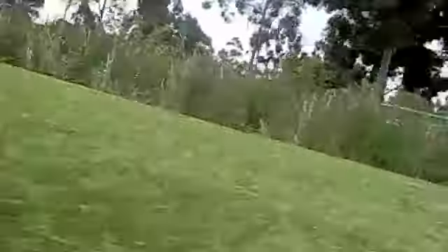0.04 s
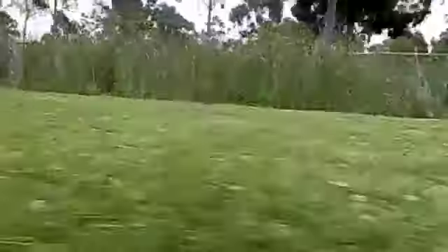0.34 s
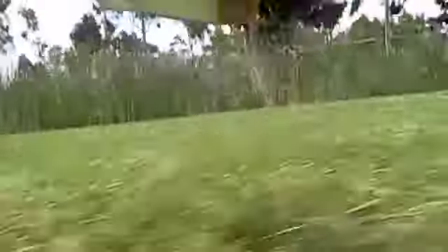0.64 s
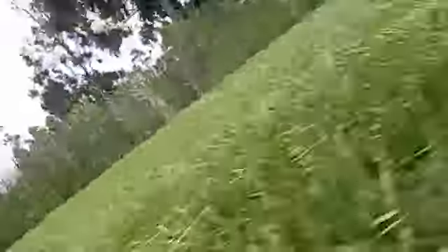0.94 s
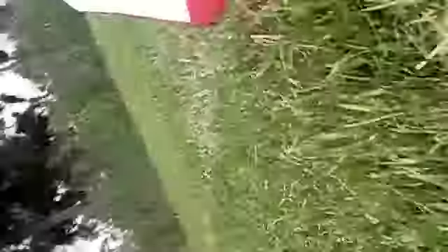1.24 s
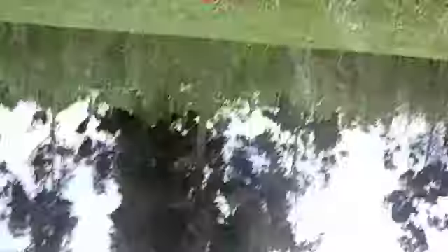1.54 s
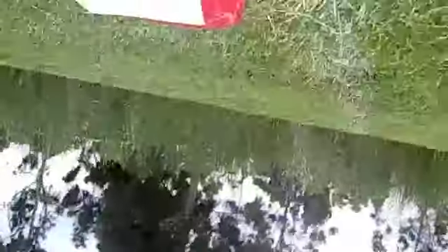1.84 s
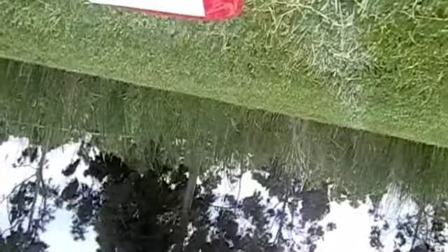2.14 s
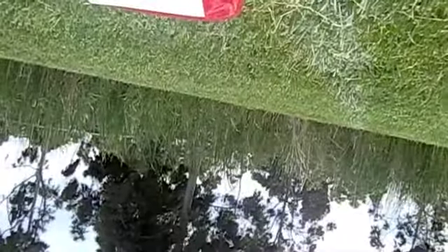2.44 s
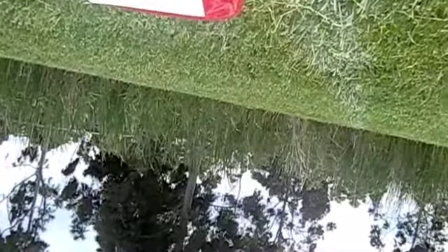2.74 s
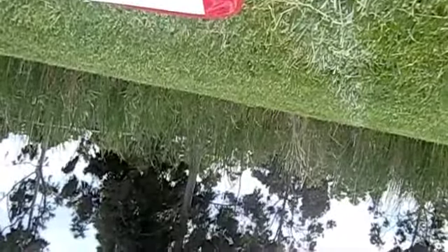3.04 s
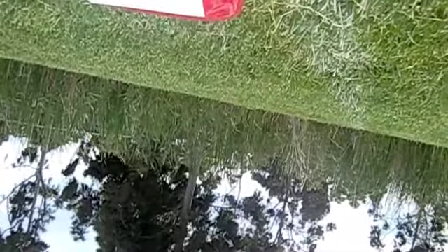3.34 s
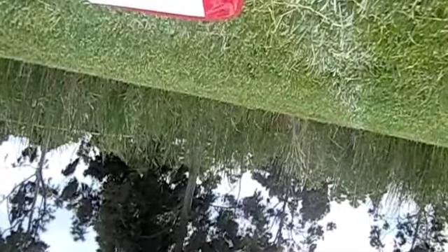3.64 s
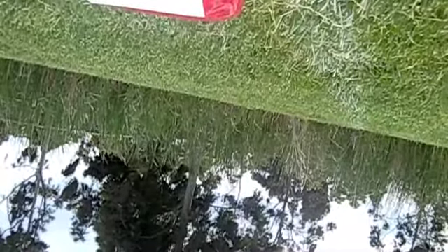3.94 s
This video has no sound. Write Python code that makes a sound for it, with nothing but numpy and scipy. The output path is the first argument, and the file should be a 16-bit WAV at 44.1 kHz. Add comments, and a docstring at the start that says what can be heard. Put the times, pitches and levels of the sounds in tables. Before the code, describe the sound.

Loud wind buffets and hisses over a microphone on a model aircraft for the first second, while a faint propeller swish winds down. From about 1.1 to 1.9 seconds the aircraft thumps on turf and scrapes through grass, with stalks snapping sharply. Around 2 seconds a small servo quietly whirs and ticks. Low outdoor rumble, a very faint hum and a faint insect trill remain until 4 seconds.

```python
"""Model aircraft landing in grass, heard on board.

Wind buffets the microphone and hisses past the airframe while the propeller winds down.
The aircraft thumps on the turf and scrapes through the stalks, which snap against it.
Once it lies still a servo whirs and ticks; outdoor rumble, a faint hum and an insect trill remain."""
import sys
import numpy as np
from scipy.fft import rfft, irfft, next_fast_len
from scipy.io import wavfile
from scipy.ndimage import map_coordinates

SR = 44100
rng = np.random.default_rng(int(sys.argv[2]) if len(sys.argv) > 2 else 0)


def int16_out(signal):
    """Quantize to a 16-bit WAV file."""
    q = np.round(np.clip(np.atleast_2d(signal).T, -1, 1) * 32767)
    wavfile.write(sys.argv[1], SR, q.astype(np.int16))


N = 176400
T = np.arange(N) / SR
CLIP_CEILING, BAND_LIMIT_HZ, CLICK_ATTACK_S = .71, 12300, .0004


def amp(db):
    """Decibels to gain."""
    return 10 ** (np.asarray(db) / 20)


def unit(x):
    """Scaled to rms 1."""
    return x / np.sqrt(np.mean(x ** 2) + 1e-20)


def curves(rows):
    """One value per sample for each column after the time."""
    times, *columns = np.transpose(rows)
    return [np.interp(T, times, column) for column in columns]


def wobble(knots_per_s):
    """Smooth random curve."""
    return map_coordinates(rng.standard_normal(8192), [T * knots_per_s + 2], mode="mirror")


def filtered(x, response):
    """x through a gain given as a function of frequency."""
    size = next_fast_len(N + SR // 2)
    return irfft(rfft(x, size) * response(np.fft.rfftfreq(size, 1 / SR)), size)[:N]


def coloured(x, spectrum):
    """x through (f/Hz, level/dB) points, rms 1."""
    hz, db = np.transpose(spectrum)
    return unit(filtered(x, lambda f: amp(np.interp(np.log(f + 1), np.log(hz + 1), db))))


def noise(spectrum):
    """Coloured noise, rms 1."""
    return coloured(rng.standard_normal(N), spectrum)


def struck(start_s, attack_s, t60_s):
    """Envelope of a blow."""
    age = np.maximum(T - start_s, 0)
    return (1 - np.exp(-age / attack_s)) * np.exp(-np.minimum(np.log(1000) * age / t60_s, 50))


def tone(hz):
    """Sine along a pitch curve, rms 1."""
    return np.sqrt(2) * np.sin(2 * np.pi * (np.cumsum(hz) / SR + rng.random()))


def grains(hits_per_s=3000, spread_db=5, rubbing_db=-5):
    """Dense tiny contacts of uneven size over smooth rubbing."""
    hits = (rng.random(N) < hits_per_s / SR) * rng.choice([-1, 1], N)
    sizes = amp(spread_db * np.minimum(rng.standard_normal(N), 2))
    return unit(hits * sizes) + amp(rubbing_db) * rng.standard_normal(N)


# Outdoor rumble: f/Hz, level/dB
RUMBLE_SPECTRUM = [(20, -38), (42, -21.5), (55, -5), (72, 2.5), (95, -0.5), (115, -4.5), (145, -4),
                   (190, -14.5), (290, -19.5), (380, -29.5), (700, -42.5), (3000, -78)]
# Faint air: f/Hz, level/dB
AIR_SPECTRUM = [(100, 1.5), (500, -3.5), (1200, -3.5), (2000, -7), (3500, -9), (6000, -12), (9000, -19),
                (12000, -19.5)]
# Electrical hum: f/Hz, level/dB at reference_s
HUM_PARTIALS = [(269, -74.5), (538, -80.5)]


def background(reference_s=3):
    """Outdoor rumble, faint air and the hum of idle electrics, all slowly growing."""
    t = T - reference_s
    rumble = amp(-50.5 + 3.5 * t + 1.8 * wobble(18)) * noise(RUMBLE_SPECTRUM)
    air = amp(-65.5 + 2.5 * t) * noise(AIR_SPECTRUM)
    hum = sum(amp(db + 4 * t + wobble(10)) * tone(hz + 2.7 * wobble(53)) for hz, db in HUM_PARTIALS)
    return rumble + air + hum


# Insect trill: t/s, level/dB
TRILL_LEVEL = [(2.0, -76), (2.23, -84), (2.45, -79), (2.88, -81.5), (2.96, -75), (3.2, -73), (3.33, -82),
               (3.43, -73.5), (3.62, -72), (3.88, -73), (4, -72)]


def insect(pitch_hz=5670, wander_hz=23.88, flutter_db=3):
    """A faint high trill flutters in the grass."""
    gain = amp(curves(TRILL_LEVEL)[0] + flutter_db * wobble(90))
    return gain * tone(pitch_hz + wander_hz * wobble(180))


# Servo motor shaft: t/s, f/Hz, level/dB
MOTOR_RUN = [(1.95, 264.2, -62), (1.975, 271, -48), (2.0, 285, -54), (2.02, 308, -47.5), (2.05, 317, -51.5),
             (2.08, 320, -60), (2.13, 350, -89)]
# Servo motor harmonics: order, level/dB
MOTOR_HARMONICS = [(1, 1), (2, -7.5), (3, -10.5)]
# Gear whistle: t/s, f/Hz, level/dB
GEAR_RUN = [(1.9, 3300, -70), (1.93, 3440, -61), (1.972, 3610, -49), (1.987, 3450, -66), (2.0, 2650, -63),
            (2.018, 2880, -58), (2.05, 2600, -63), (2.075, 2380, -68), (2.09, 2310, -93)]
# Gear harmonics: order, level/dB
GEAR_HARMONICS = [(1, 1), (2, -11), (3, -17), (4, -15)]
# Settling ticks: t/s, level/dB
SERVO_TICKS = [(1.967, -47.5), (2.049, -45.5), (2.056, -47.5), (2.07, -49), (2.093, -60), (2.117, -57),
               (2.136, -59.5), (2.158, -55.5), (2.18, -56.5), (2.202, -60.5), (2.224, -58.5)]
# Servo case resonances: f/Hz, level/dB
CASE_SPECTRUM = [(300, -29), (680, 6), (1050, -21), (1350, 6.5), (1700, -27), (2700, -10), (3450, 0),
                 (4200, -10.5), (12000, -27.5)]


def servo(motor_jitter=.05, gear_jitter=.022, rough_db=1.5, grind_db=-9.5):
    """The motor grinds briefly with a gear whistle, then ticks in its case as it settles."""
    motor_hz, motor_db = curves(MOTOR_RUN)
    gear_hz, gear_db = curves(GEAR_RUN)
    motor_hz *= 1 + motor_jitter * wobble(250)
    gear_hz *= 1 + gear_jitter * wobble(700)
    motor = sum(amp(db) * tone(order * motor_hz) for order, db in MOTOR_HARMONICS)
    motor += amp(grind_db) * coloured(grains(), CRACKLE_SPECTRUM)
    motor *= amp(motor_db + rough_db * wobble(200))
    motor *= (T > MOTOR_RUN[0][0]) * (T < MOTOR_RUN[-1][0])
    gear_gain = amp(gear_db + rough_db * wobble(200)) * (T > GEAR_RUN[0][0]) * (T < GEAR_RUN[-1][0])
    gear = gear_gain * sum(amp(db) * tone(order * gear_hz) for order, db in GEAR_HARMONICS)
    ticks = sum(amp(db) * struck(start_s, CLICK_ATTACK_S, t60_s=.053) for start_s, db in SERVO_TICKS)
    return motor + gear + ticks * noise(CASE_SPECTRUM)


# Propeller winding down: t/s, rotation f/Hz, level/dB
PROPELLER_RUN = [(0, 119, -42), (.13, 116, -43), (.24, 109, -51), (.42, 102, -52), (.55, 95, -80)]
# Blade swish: f/Hz, level/dB
SWISH_SPECTRUM = [(2000, -25), (5000, -10.5), (7500, -3.5), (11000, -0.5), (12000, -2)]


def propeller(pulse_db=7):
    """A thin swish once a turn."""
    turn_hz, db = curves(PROPELLER_RUN)
    pulses = amp(pulse_db * tone(turn_hz) / np.sqrt(2))
    return amp(db) * unit(pulses * noise(SWISH_SPECTRUM))


# Motor whine (first two rows), then whistles: f/Hz, bandwidth/Hz, peak t/s, 1/e half-length/s, level/dB
WHINE_AND_WHISTLE_BANDS = [(8700, 300, .07, .17, -55.5), (7860, 260, .07, .15, -58),
                           (3160, 300, .82, .22, -47), (4664, 510, .83, .16, -49.5),
                           (2310, 170, 0.81, 0.2, -47), (1310, 160.8, 0.58, 0.23, -43)]


def whine_and_whistles():
    """Thin high motor whine at the start, then brief lower airflow whistles."""
    out = np.zeros(N)
    for hz, width_hz, peak_s, half_length_s, db in WHINE_AND_WHISTLE_BANDS:
        band = filtered(rng.standard_normal(N), lambda f: 1 / (1 + (2 * (f - hz) / width_hz) ** 2))
        out += amp(db) * np.exp(-((T - peak_s) / half_length_s) ** 2) * unit(band)
    return out


# Airframe shudder: t/s, level/dB
SHUDDER_LEVEL = [(0, -25), (.13, -25.5), (.21, -34.5), (.33, -30.5), (.47, -23), (.8, -23), (.86, -31.5),
                 (.98, -21), (1.07, -42), (1.13, -37), (1.22, -39.5), (1.35, -33.5), (1.43, -35.5),
                 (1.65, -33.5), (1.85, -45), (2.08, -56), (2.2, -90)]
# Airframe shudder: f/Hz, level/dB
SHUDDER_SPECTRUM = [(25, -13.5), (60, -3.5), (130, 0), (280, -2.5), (500, -14), (1000, -26), (3000, -62.5)]
# Air and grass hiss: t/s, level/dB
HISS_LEVEL = [(0, -43.5), (.12, -44), (.29, -46.5), (.45, -37.5), (.49, -26.5), (.535, -25), (.58, -31.5),
              (.67, -38), (.76, -32.5), (.85, -37.5), (.93, -36.5), (1.05, -44), (1.2, -46.5), (1.75, -49),
              (1.95, -55), (2.12, -77), (2.4, -100)]
# Air and grass hiss: f/Hz, level/dB
HISS_SPECTRUM = [(100, -8), (700, 4), (1400, 7.5), (2100, 1.5), (3000, 2), (3800, -0.5), (4700, -3),
                 (5600, -5.5), (8500, -6.5), (12000, -11.5)]


def airframe(flutter_db=2):
    """The airframe shudders, and air and grass tips hiss along it."""
    shudder = amp(curves(SHUDDER_LEVEL)[0]) * noise(SHUDDER_SPECTRUM)
    hiss = amp(curves(HISS_LEVEL)[0] + flutter_db * wobble(200)) * noise(HISS_SPECTRUM)
    return shudder + hiss


def flicks(per_s=600, centre_hz=2898, spread_octaves=1.3, decay_cycles=6):
    """Single stalks ring briefly at random pitches as they flick off the airframe; rms 1."""
    count = int(per_s * N / SR)
    when, pitch, size = rng.random((count, 3)).T[:, :, None]
    hz = np.clip(centre_hz * 2 ** (spread_octaves * (2 * pitch - 1)), 300, BAND_LIMIT_HZ)
    age_samples = np.arange(700)
    cycles = hz * age_samples / SR
    rings = size ** 2 * np.sin(2 * np.pi * cycles) * np.exp(-cycles / decay_cycles)
    positions = (when * N).astype(int) + age_samples
    return unit(np.bincount(positions.ravel(), rings.ravel(), N)[:N])


# Grass scrapes: peak t/s, rise/s, fall/s, level/dB, relative hull level/dB
GRASS_SCRAPES = [(1.077, .004, 0.015, -40.5, -3.5), (1.135, 0.068, 0.06, -41.5, -4),
                 (1.183, .004, 0.011, -32.5, -9.5), (1.25, .035, 0.022, -34, -2),
                 (1.294, .004, 0.019, -30, -3), (1.313, 0.00498, 0.0072, -35, -3.5),
                 (1.363, 0.025, 0.032, -30.5, -7.5), (1.411, .008, 0.023, -40.5, 0),
                 (1.456, .009, 0.008, -37, 5.5), (1.494, .026, .03, -23, -2.5),
                 (1.546, .014, 0.041, -33, 2.5), (1.604, 0.02, 0.015, -25, -4.5),
                 (1.655, 0.0081, .014, -27.5, -9.5), (1.676, .005, 0.0097, -40, 4.5),
                 (1.739, 0.054, 0.019, -31, -2), (1.778, .003, .008, -35.5, -9),
                 (1.814, .018, 0.035, -41, 0), (1.875, .022, 0.047, -42, -9.5),
                 (1.942, .003, 0.0045, -37, -8), (1.959, .006, 0.012, -47, -3)]
# Stalk crackle, also the servo's grind: f/Hz, level/dB
CRACKLE_SPECTRUM = [(100, -29), (600, -5), (1100, -0.5), (1600, -5), (2300, 1), (3300, -4), (4400, -6.5),
                    (5500, -13.5), (8000, -17.5), (12000, -22)]
# Hull resonances: f/Hz, level/dB
HULL_SPECTRUM = [(50, -17.5), (150, -3), (280, -3), (365, 2), (560, -2.5), (900, -4), (1100, 0.5),
                 (1300, -9), (1600, -19), (4000, -41)]


def scrapes(crackle_db=-2, flick_db=-5.5, hull_db=1):
    """Each scrape swells and fades, crackling in the stalks and sounding the hollow hull."""
    stalk_power, hull_power = np.zeros(N), np.zeros(N)
    for peak_s, rise_s, fall_s, db, hull_share_db in GRASS_SCRAPES:
        width_s = np.where(T < peak_s, rise_s, fall_s)
        swell = amp(db) * np.exp(-np.abs((T - peak_s) / width_s) ** 1.6)
        stalk_power += swell ** 2
        hull_power += (swell * amp(hull_share_db)) ** 2
    stalks = amp(crackle_db) * coloured(grains(), CRACKLE_SPECTRUM) + amp(flick_db) * flicks()
    hull = amp(hull_db) * coloured(grains(), HULL_SPECTRUM)
    return np.sqrt(stalk_power) * stalks + np.sqrt(hull_power) * hull


# Snapping stalks: t/s, level/dB, f/Hz, t60/s
STALK_SNAPS = [(1.3398, -1.5, 12000, .005), (1.34, -14, 6000, .004), (1.3599, -17.5, 2208, .012),
               (1.52, -17, 9500, 0.0036), (1.522, -22.5, 4700, 0.0052), (1.55, -24, 4260, 0.011),
               (1.613, -23.5, 8500, .009), (1.7045, -17, 10940, 0.0034), (1.0754, -30, 2600, .016),
               (1.1799, -17, 1920, 0.0099), (1.289, -23.5, 2490, 0.0087), (1.4513, -26, 2200, .014),
               (1.876, -28, 3270, 0.0079), (1.995, -43, 5000, 0.011), (2.325, -53, 4300, 0.011)]


def snaps(half_width_octaves=.68):
    """Stalks snap against the airframe, each a brief crack around its own pitch."""
    out = np.zeros(N)
    for start_s, db, hz, t60_s in STALK_SNAPS:
        white = rng.standard_normal(N)
        crack = filtered(white, lambda f: 1 / (1 + (np.log2((f + 1) / hz) / half_width_octaves) ** 2))
        out += amp(db) * struck(start_s, CLICK_ATTACK_S, t60_s) * unit(crack)
    return out


# Blows on the turf: t/s, level/dB, f/Hz, t60/s
TURF_THUMPS = [(1.26, -16, 150, .17), (1.307, -17, 108, 0.056), (1.335, -19.5, 74, 0.14),
               (1.484, -18.5, 357, .09), (1.486, -34, 1080, .12), (1.575, -18, 78.1, 0.095)]


def thumps(attack_s=.005, thud_db=-2):
    """The airframe hits soft turf: a damped swing and a dull thud."""
    thud = amp(thud_db) * noise(SHUDDER_SPECTRUM)
    out = np.zeros(N)
    for start_s, db, hz, t60_s in TURF_THUMPS:
        swing = np.sin(2 * np.pi * hz * (T - start_s))
        out += amp(db) * struck(start_s, attack_s, t60_s) * (swing + thud)
    return out


# Airspeed at the microphone port: t/s, speed ratio
AIRSPEED = [(0, .55), (.038, 0.62), (.047, 1.0), (.18, 0.87), (.33, 0.96), (.45, 1.083), (.57, 0.83),
            (.635, 0.89), (.67, .62), (.72, .8), (.79, .58), (.85, 0.42), (1.0, 0.39), (1.1, .28)]
# Gusts: t/s, level/dB
GUST_LEVEL = [(0, -22), (.038, -25), (.047, -12.5), (.07, -17.5), (.115, -15), (.15, -13.5), (.195, -16),
              (.228, -13), (.3, -13), (.395, -10.5), (.465, -14.5), (.505, -11), (.575, -16.5),
              (.632, -13.5), (.662, -20), (.718, -15), (.75, -17), (.775, -17), (.845, -34), (.9, -20),
              (.922, -25.5), (.955, -21.5), (1.0, -22), (1.055, -40.5), (1.2, -56), (1.5, -99)]
# Eddies at speed ratio 1: f/Hz, level/dB
EDDY_SPECTRUM = [(20, -9.5), (100, -6), (250, -2.5), (420, 0.5), (700, -1.5), (1050, -4), (1500, -10.5),
                 (2100, -17), (3000, -27.5), (5000, -42), (10000, -61)]
# Air slaps: t/s, level/dB
AIR_SLAPS = [(.043, -18.5), (.216, -14), (.313, -14), (.456, -12.5), (.622, -15.5), (.718, -17)]
# Air slaps: f/Hz, level/dB
SLAP_SPECTRUM = [(100, -12.5), (500, -1.5), (900, 0), (1600, -6), (2400, -14), (3500, -29), (8000, -47)]
# Rasp at pressure crests and troughs: f/Hz, level/dB
RASP_SPECTRUM = [(500, -27), (1500, -1.5), (2500, -2.5), (4500, -3.5), (7000, -11), (12000, -18)]


def wind(flutter_octaves=.15, flutter_db=2, rasp_db=-12.5, chop_db=6):
    """Eddies sweep the microphone port, brighter with speed, with slaps and a rasp at each crest and trough."""
    flutter = wobble(170)  # each small eddy is both louder and brighter
    speed = curves(AIRSPEED)[0] * 2 ** (flutter_octaves * flutter)
    eddies = map_coordinates(noise(EDDY_SPECTRUM), [np.cumsum(speed)], mode="mirror")
    gusts = amp(curves(GUST_LEVEL)[0] + flutter_db * flutter)
    slaps = sum(amp(db) * struck(start_s, attack_s=.002, t60_s=.087) for start_s, db in AIR_SLAPS)
    roar = gusts * eddies + slaps * noise(SLAP_SPECTRUM)
    wake = tone(curves(PROPELLER_RUN)[0])  # chops the rasp once a turn
    crests = np.minimum(np.abs(roar), CLIP_CEILING) ** 3
    return roar + amp(rasp_db + chop_db * wake) * crests * noise(RASP_SPECTRUM)


def scene():
    """Flight, landing and surroundings as heard on board, mono."""
    flight = wind() + propeller() + airframe() + whine_and_whistles()
    landing = scrapes() + thumps() + snaps() + servo()
    return (flight + landing + background() + insect())[None]


def record(dry):
    """The on-board camera cuts deep bass, rounds off the loudest peaks and limits the band."""
    low_cut_hz, knee = 58, 1.9
    bass_cut = filtered(dry[0], lambda f: 1 / np.sqrt(1 + (low_cut_hz / (f + 1)) ** 10))
    clipped = bass_cut / (1 + np.abs(bass_cut / CLIP_CEILING) ** knee) ** (1 / knee)
    return filtered(clipped, lambda f: f < BAND_LIMIT_HZ)[None]


dry = scene()
out = record(dry)
int16_out(out)
```